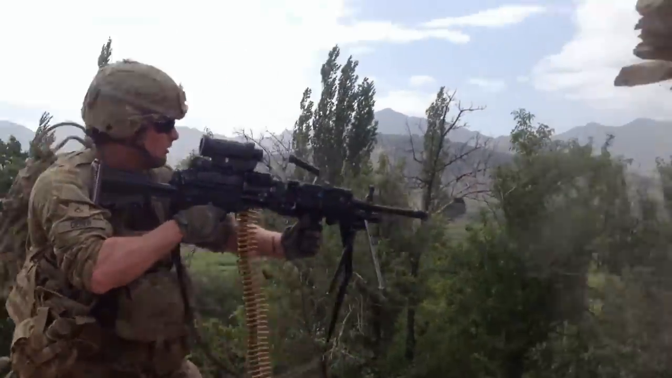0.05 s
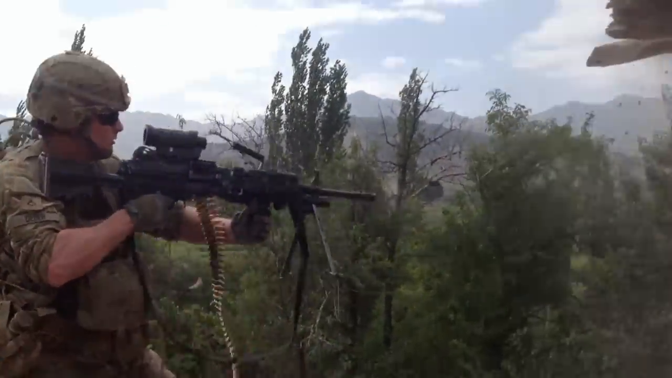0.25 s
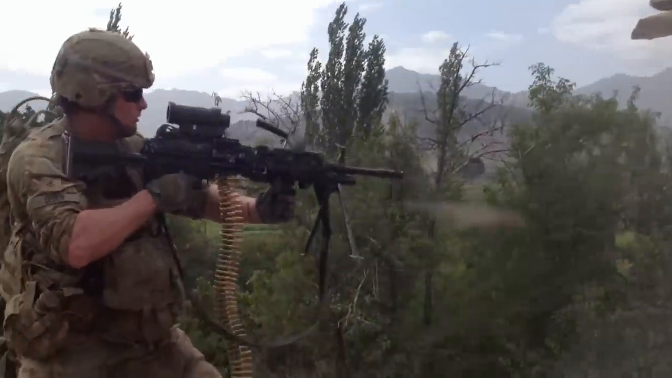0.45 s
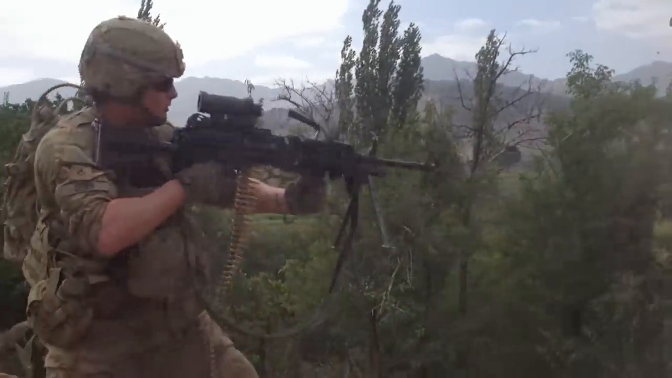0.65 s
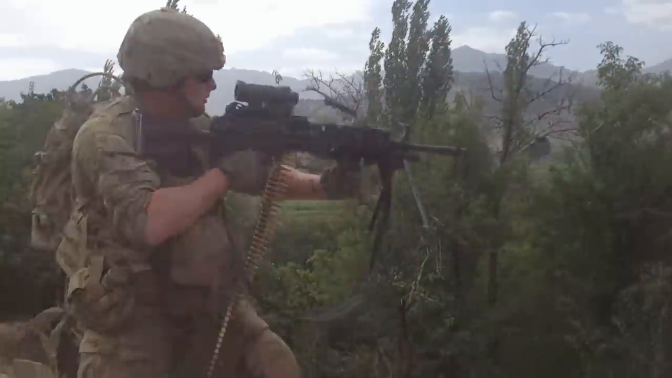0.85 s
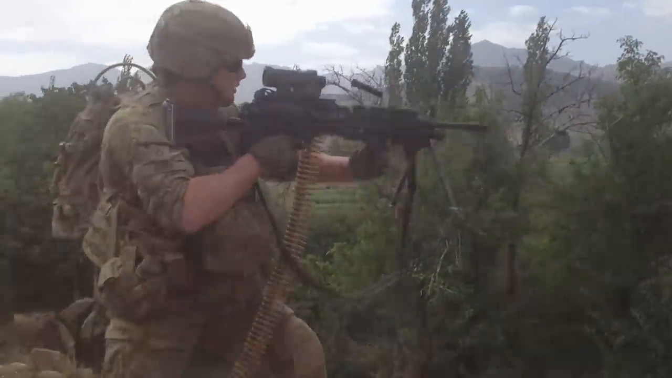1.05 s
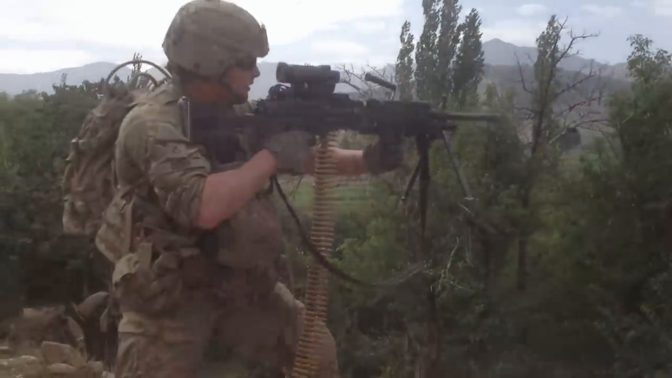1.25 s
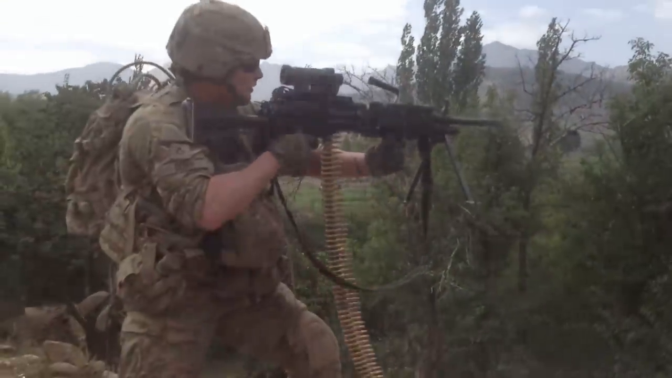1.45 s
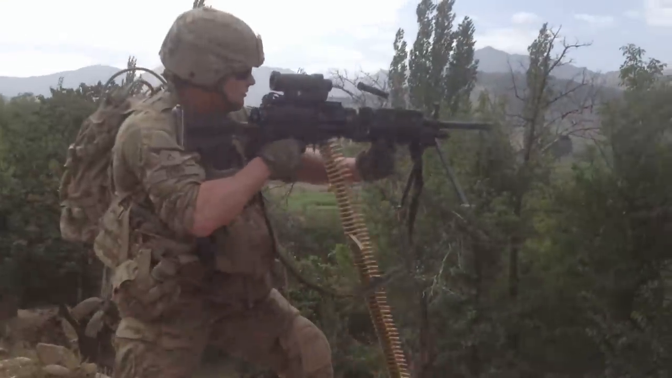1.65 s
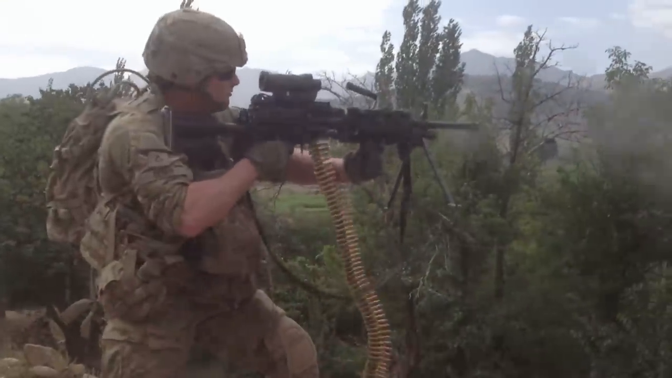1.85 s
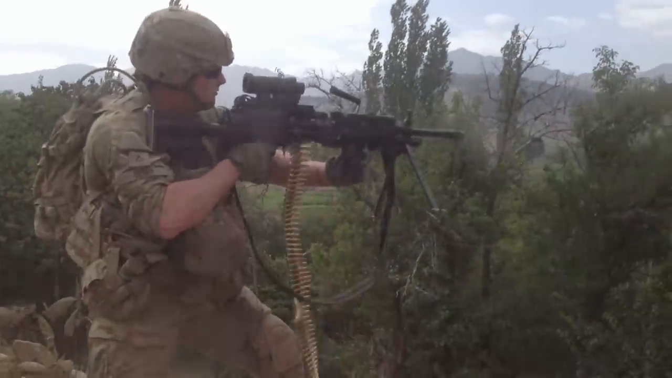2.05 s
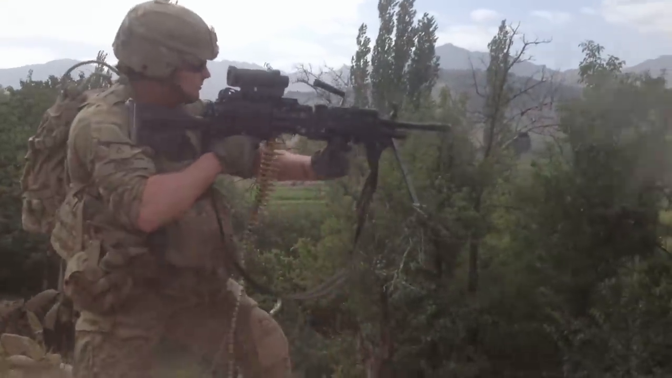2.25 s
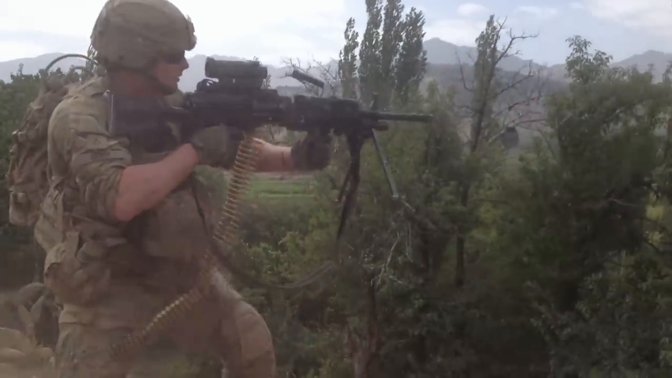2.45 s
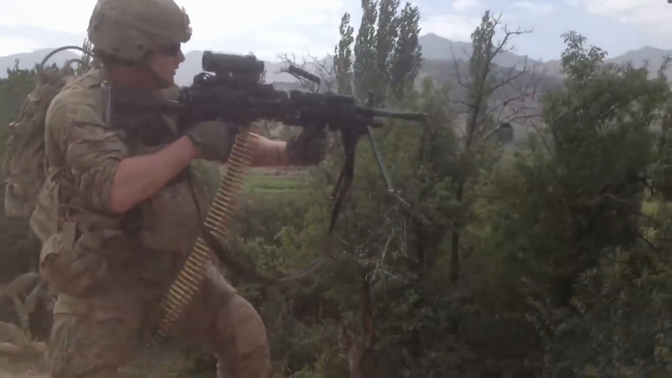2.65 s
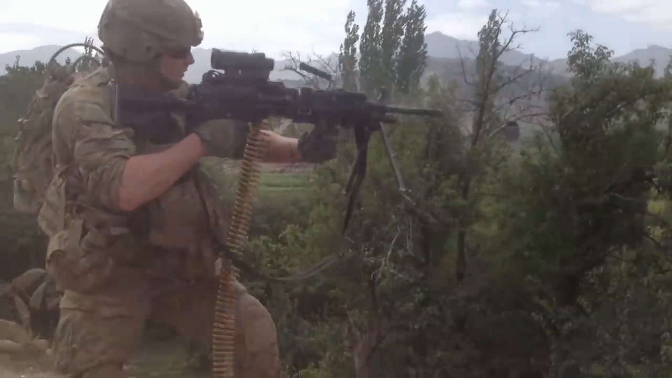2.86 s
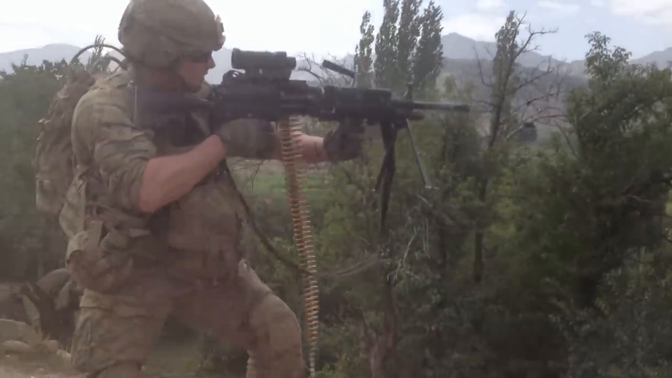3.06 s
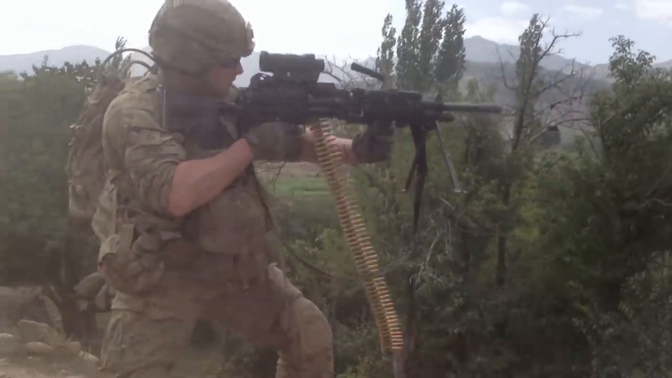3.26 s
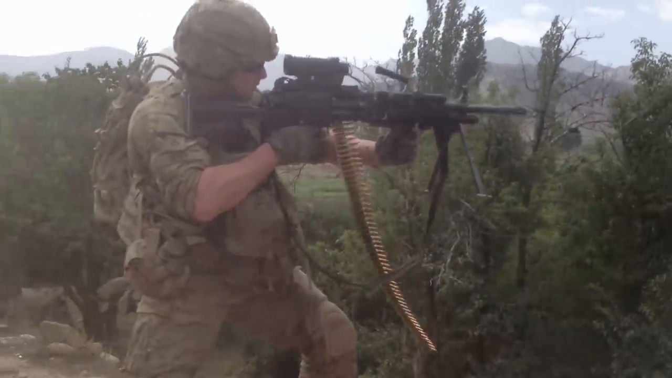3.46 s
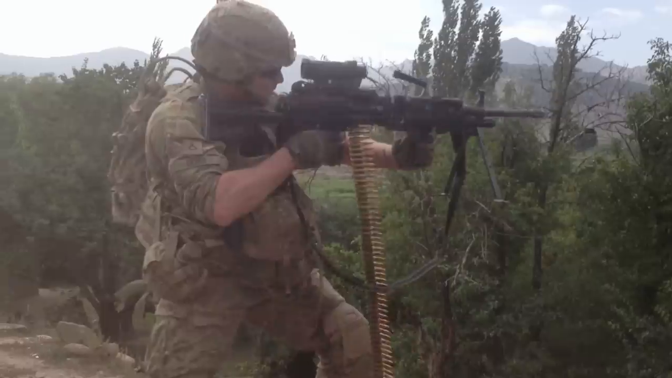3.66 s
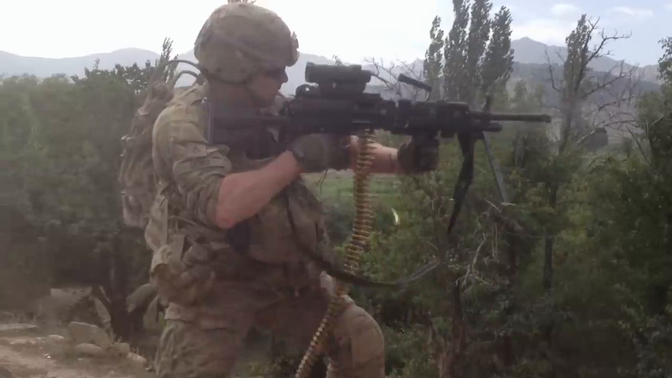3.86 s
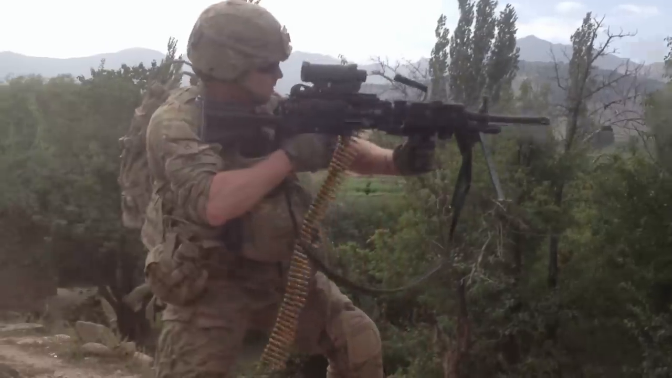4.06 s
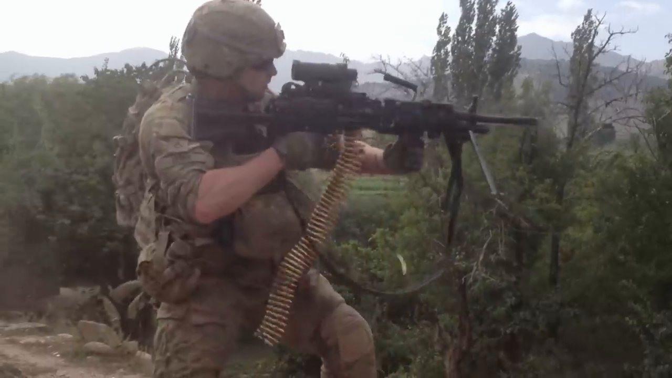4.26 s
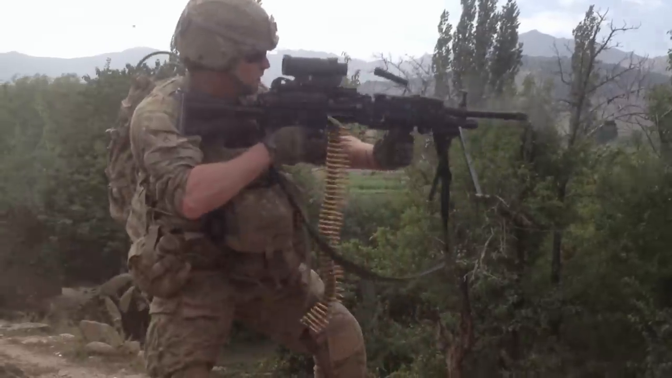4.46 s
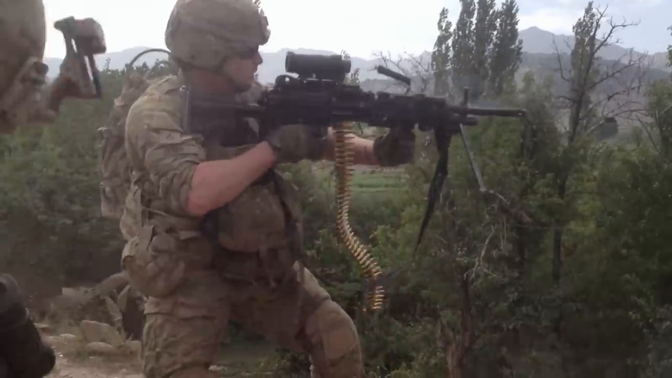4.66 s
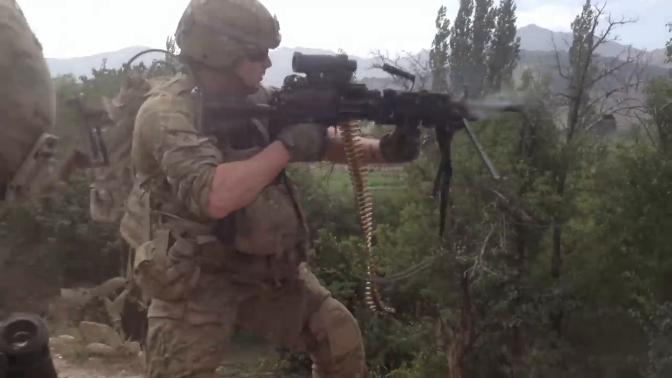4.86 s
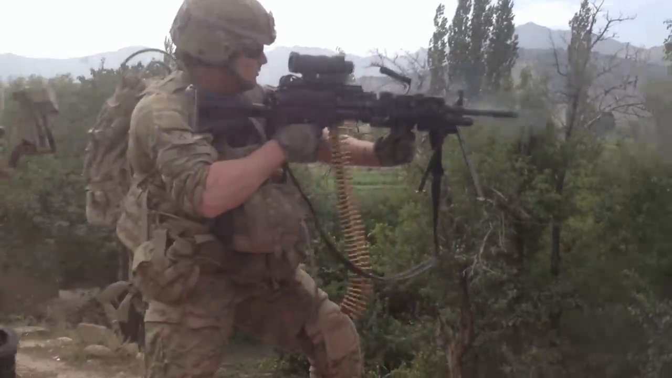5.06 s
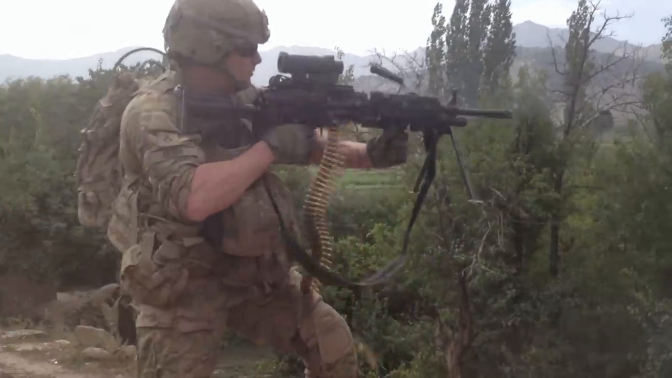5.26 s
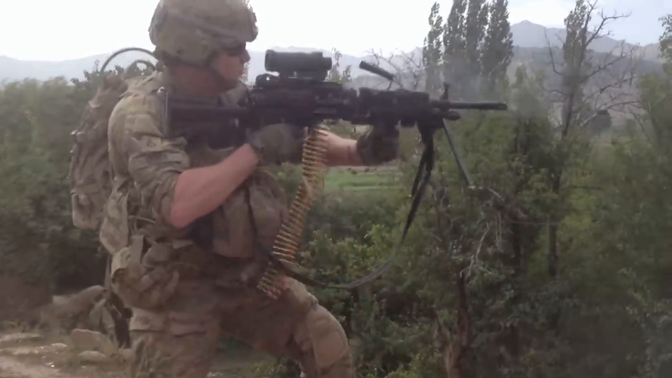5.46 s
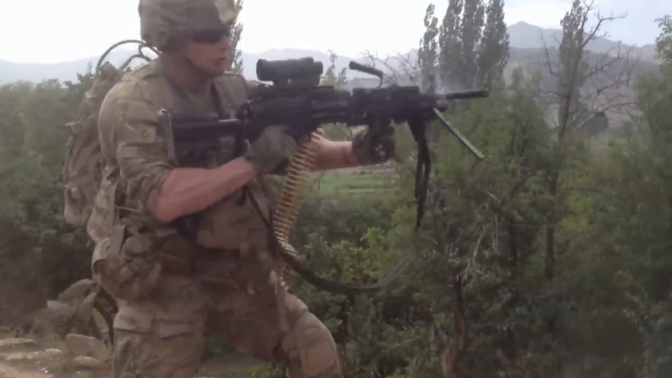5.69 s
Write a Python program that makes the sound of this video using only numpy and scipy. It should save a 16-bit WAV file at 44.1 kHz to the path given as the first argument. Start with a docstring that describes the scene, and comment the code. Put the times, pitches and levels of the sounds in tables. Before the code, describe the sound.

The sound starts immediately with a hard, distorted burst from a belt-fed gun, then a ringing valley tail, bright metal tinkles and three duller pops from another gun. A short rattle leads into a second burst. More tinkling and three faint thuds follow, then a third burst, a brief gap, and a fourth ends it. The close microphone clips and thumps over faint outdoor air.

```python
"""A belt-fed light machine gun fires a burst at once, each shot a blast with echoes off ground and walls.
The bolt clatters after each round as clusters of steel noise, slopes slap back, and the valley rings on.
In the pauses links and cases tinkle down as dying tones; another gun pops three times before the second burst.
Three dull thuds come before the third burst, and a fourth burst of gunfire ends the scene. The bolt rattles
before bursts 2 to 4. Blasts overload the microphone and push it into deep thumps, over faint outdoor air."""
import sys
import numpy as np
from scipy import signal
from scipy.fft import rfft, irfft
from scipy.io import wavfile
from scipy.ndimage import uniform_filter1d

SR = 44100
rng = np.random.default_rng(int(sys.argv[2]) if len(sys.argv) > 2 else 0)


def unload_wav(signal):
    """Save mono or channel-first audio to the path in sys.argv[1] as 16-bit WAV at rate SR, clipped to [-1, 1]."""
    wavfile.write(
        sys.argv[1],
        SR,
        np.round(np.clip(np.atleast_2d(signal).T, -1, 1) * 32767).astype(np.int16),
    )


N = 252472  # length of the scene in samples

# tone colour of the dragged belt and of metal ticks on stone: [f/Hz, relative level/dB]
BELT_COLOUR = [(100, -34), (500, -25), (1500, -14), (3200, -12.5), (4600, -6.5), (5600, 5), (6300, -4),
               (7500, -14), (10000, -22), (13000, -16), (16000, -22)]
# tone colour of the rolling far hills and of the outdoor air: [f/Hz, relative level/dB]
HILLS_COLOUR = [(30, -44), (80, -11), (170, -1.5), (420, -1), (750, -10.5), (1500, -13.5), (3500, -18.5),
                (5500, -14.5), (8000, -34.5), (15000, -31)]


def gain_of(db):
    """Turns decibels into an amplitude factor."""
    return 10 ** (np.asarray(db) / 20)


def read(points, hz):
    """Reads a table at the frequencies hz, with straight lines on a log-frequency axis."""
    f, value = np.transpose(points)
    return np.interp(np.log(hz + 1), np.log(f + 1), value)


def clock(size):
    """Gives the time in seconds of each of size samples."""
    return np.arange(size) / SR


def add(mix, s, sound):
    """Mixes a sound in at s seconds, cutting off what falls outside the mix."""
    at = round(s * SR)
    sound = sound[max(-at, 0):]
    part = mix[max(at, 0):][:len(sound)]
    part += sound[:len(part)]


def band(x, low_hz, high_hz):
    """Keeps the range between two frequencies, with gentle edges."""
    edges_hz = [low_hz, min(high_hz, SR / 2 - 1)]
    return signal.sosfilt(signal.butter(2, edges_hz, "band", fs=SR, output="sos"), x)


def noise(colour, size):
    """Makes noise of rms 1: the colour sets each frequency's strength, and its phase is random."""
    hz = np.fft.rfftfreq(size, 1 / SR)
    phases = np.exp(2j * np.pi * rng.random(len(hz)))
    x = irfft(gain_of(read(colour, hz)) * phases, size)
    return x / x.std()


def puff(colour, db, decay, rise=0.00057, size=8192):
    """Makes a burst of coloured noise that swells over rise seconds and dies away over decay seconds."""
    t = clock(size)
    envelope = (1 - np.exp(-t / rise)) * np.exp(-t / decay)
    return gain_of(db) * noise(colour, size) * envelope


def blast(t, push_ms):
    """A blast wave: a jump in pressure, then a longer suction."""
    u = np.maximum(t, 0) * 1000 / push_ms
    return (t >= 0) * (1 - u) * np.exp(-u)


def rattle(colour, db, decay, grain_db=1.5, rise=0.00057, size=8192):
    """Loose steel parts knock together: grainy noise, coloured by the metal's resonances, dies away."""
    t, hz = clock(size), np.fft.rfftfreq(size, 1 / SR)
    # a slower random curve makes the noise grainy
    knocks = uniform_filter1d(rng.standard_normal(size), size=48)
    grain = gain_of(grain_db * np.minimum(knocks / knocks.std(), 2))
    drive = rng.standard_normal(size) * grain
    x = irfft(rfft(drive) * gain_of(read(colour, hz)), size)
    envelope = (1 - np.exp(-t / rise)) * np.exp(-t / decay)
    return gain_of(db) * x / x.std() * envelope


def ring(modes, struck_hz, lift_db=10, detune=0.00146, spin_hz=11, tumble=0.86, rise=.00097, size=32768):
    """A small metal part rings in several dying tones; each swells and fades as the part tumbles."""
    t = clock(size)
    hz, db, t60 = np.transpose(modes)[:, :, None]
    pitch, strength, phase, spin, facing = rng.standard_normal((5, len(modes), 1))
    # the spot that is struck changes the level of the tones near struck_hz
    lift = lift_db * np.exp(-((hz - struck_hz) / 520) ** 2)
    db = db + 2.0 * strength + lift
    fade_db = -60 * t / t60  # t60 is the time to fall by 60 dB
    turn_hz = spin_hz * np.exp(.3 * spin)
    turning = 1 - tumble * np.sin(2 * np.pi * turn_hz * t + facing) ** 2
    tones = np.sin(2 * np.pi * (hz * (1 + detune * pitch) * t + phase))
    return (gain_of(db + fade_db) * turning * tones).sum(0) * (1 - np.exp(-t / rise))


def firing():
    """Each round follows the last by one bolt cycle: rows of (s, level dB, extra low-echo level dB)."""
    # pulls of the trigger; the rate of fire drifts as the belt swings:
    # [first shot t/s, count of rounds, rounds a minute at the start, in the middle, at the end]
    bursts = [(-.0091, 9, 763.6, 764.6, 758.7), (1.7654, 10, 736, 752.3, 787.2),
              (3.8947, 10, 750.3, 785, 760.6), (5.0545, 9, 769.8, 797.5, 772.7)]
    shot_db, uneven_db = 0.8, 0.5  # strength of a round, and its random spread
    boom_first_db, boom_last_db = -2.9, -0.45  # the low echoes build up through a burst
    shots = []
    for start, count, *per_minute in bursts:
        cycles = 60 / np.interp(np.linspace(0, 1, count - 1), [0, .5, 1], per_minute)
        times = start + np.r_[0, np.cumsum(cycles)]
        levels = shot_db + uneven_db * rng.standard_normal(count)
        booms = np.linspace(boom_first_db, boom_last_db, count)
        shots += zip(times, levels, booms)
    return shots


def muzzle(shots):
    """The blast arrives by the same paths each round; the turbulent crack of the gas is new each time."""
    # blast paths, direct and off nearby ground and walls: [delay/ms, level/dB, pressure push/ms]
    paths = [(.6, -44, 0.15), (5.32, -5, 1.57), (12.29, 2, 0.48), (16.99, -1, 0.33), (20.88, 8, 0.58),
             (25.8, -10.5, 0.96), (30.79, -0.5, 1), (33.86, 3, 0.78), (41.68, 0, 0.46), (47.04, -10, 0.45),
             (54.48, 0, 0.48), (65.2, -6, 0.81)]
    # tone colour of the escaping gas: [f/Hz, relative level/dB]
    crack_colour = [(60, -28), (200, -8), (500, 3.5), (1000, 2), (1600, 0.5), (3000, -0.5), (4200, 2.5),
                    (5050, 6), (6300, -4.5), (8000, -9.5), (10000, -26), (13000, -8.5), (16000, -18)]
    # tone colour of the scatter from rocks and leaves: [f/Hz, relative level/dB]
    scatter_colour = [(40, -37), (100, -10.5), (170, -15), (300, -3.5), (700, 2), (1100, -4.5),
                      (1600, -2.5), (3000, -7), (6000, -37), (10000, -42.5)]
    t, out = clock(size=8192), np.zeros(N)
    arrivals = sum(gain_of(db) * blast(t - ms / 1000, push) for ms, db, push in paths)
    boom = gain_of(2.5) * band(arrivals, low_hz=155.6, high_hz=910)
    # the nearest walls knock hardest
    boom += gain_of(-9.0) * band(arrivals, low_hz=420, high_hz=576) * (t < .04)
    # the farthest wall answers with a hollow note
    late, hollow_hz = t - .0663, 255
    boom -= gain_of(-11) * np.cos(2 * np.pi * hollow_hz * late) * np.exp(-(late / 0.0077) ** 2)
    surroundings = (1 - np.exp(-t / 0.0037)) * np.exp(-t / 0.084) / (1 + np.exp((t - .078) / 0.001))
    # rocks scatter every round alike
    boom += gain_of(-18.5) * noise(scatter_colour, len(t)) * surroundings
    roar = (1 - np.exp(-t / 0.0011)) / (1 + np.exp((t - .022) / 0.0045))
    for s, db, boom_db in shots:
        crack = gain_of(-5.5) * noise(crack_colour, len(t)) * roar
        leaves = gain_of(-20.5) * noise(scatter_colour, len(t)) * surroundings
        add(out, s, gain_of(db) * (gain_of(boom_db) * boom + crack + leaves))
        # the farthest wall also returns the crack
        add(out, s + .066, gain_of(db - 10) * band(crack, low_hz=1000, high_hz=3200))
    return out


def action(shots, jitter=.001, uneven_db=0.9):
    """The bolt locks, unlocks, hits its buffer and feeds the next round, never twice quite alike."""
    # steel blows in one cycle of the bolt: [delay after the shot/s, level/dB, decay/s]
    cycle = [(-.007, -14.5, 0.0063), (.003, -5.5, 0.02), (.026, -13.5, 0.013), (0.04, -10.5, 0.022),
             (0.063, -13.5, 0.046)]
    # tone colour of the bolt's steel: [f/Hz, relative level/dB]
    steel_colour = [(100, -47), (400, -2), (1200, -19.5), (3000, -9), (4200, -2), (5000, 3), (5600, 1),
                    (6500, -5.5), (8000, -14), (10000, -22.5), (13000, -17), (16000, -29)]
    out = np.zeros(N)
    for s, *_ in shots:
        for delay, db, decay in cycle:
            late, force = rng.standard_normal(2)
            blow = rattle(steel_colour, db + uneven_db * force, decay)
            add(out, s + delay + jitter * late, blow)
    return out


def run_up(count=4, grain_db=-2.5):
    """The freed bolt drags the belt in even jerks, harder as it gathers speed, then chambers a round."""
    # the trigger lets the bolt run forward before a burst: [t/s, length of the run/s, level/dB]
    run_ups = [(1.7095, .051, -16), (3.837, 0.052, -14), (5.008, 0.051, -19.5)]
    release_db, chamber_db = -8, 7  # the catch lets go; a round goes home
    drag_first_db, drag_last_db = -5.5, -3.5
    drag_delay_s, drag_decay_s = .005, 0.014
    out = np.zeros(N)
    for s, length, db in run_ups:
        add(out, s, rattle(BELT_COLOUR, db + release_db, decay=0.0057, rise=.002))
        jerks = np.linspace(drag_delay_s, length, count, endpoint=False)
        drags = np.linspace(drag_first_db, drag_last_db, count)
        for delay, drag_db in zip(jerks, drags):
            add(out, s + delay, rattle(BELT_COLOUR, db + drag_db, drag_decay_s, grain_db))
        add(out, s + length, rattle(BELT_COLOUR, db + chamber_db, decay=0.021))
    return out


def spent_metal(shots):
    """Links and cases tick on the stones and ring; stray links tinkle faintly after every round."""
    # belt links landing close by: [t/s, tick level/dB, ring level/dB, favoured tone f/Hz]
    links = [(1.025, -48, -42, 4050), (1.081, -48, -44.5, 4050), (1.117, -27, -41.5, 4130),
             (1.152, -55, -40.5, 5560), (1.28, -55, -47.5, 4960), (1.3585, -58, -45.5, 5740),
             (3.0066, -26, -42, 10800), (3.073, -33, -46.5, 5668), (3.312, -32, -48, 10600),
             (3.328, -44, -41, 4600), (3.46, -52, -50, 4066), (3.534, -41, -50, 5560),
             (3.605, -40, -53.5, 4066)]
    # empty cases landing close by: [t/s, tick level/dB, ring level/dB]
    cases = [(0.795, -42, -29), (2.838, -42, -38), (3.1192, -44, -37), (3.5245, -21, -30),
             (3.593, -26.5, -32), (3.747, -39, -34)]
    # ringing tones of a link: [f/Hz, level/dB, time to fall by 60 dB/s]
    link_modes = [(3850, -7.5, 0.66), (4060, -1, 0.55), (4960, -1.5, 0.49), (5660, -2, 0.32),
                  (5680, -2.5, 1), (7110, -11, 0.7), (8280, -17, 0.39), (9330, -19.5, 1),
                  (10680, -10.5, 0.61), (12680, -19, .4), (14250, -18, .4)]
    # ringing tones of a case: [f/Hz, level/dB, time to fall by 60 dB/s]
    case_modes = [(9570, -17, 0.36), (12420, -12, 0.32), (14630, -1, 0.24), (14760, -12, .3)]
    flip_s, flip_db = 0.0092, -9  # a case lands on one end, then on the other
    stray_fall_s, stray_spread_s, stray_db = 0.46, 0.67, -52  # links that land farther off
    out = np.zeros(N)
    for s, tick_db, ring_db, hz in links:
        add(out, s, puff(BELT_COLOUR, tick_db, decay=0.0016))
        add(out, s, gain_of(ring_db) * ring(link_modes, hz))
    for s, tick_db, ring_db in cases:
        add(out, s, puff(BELT_COLOUR, tick_db, decay=0.0019))
        add(out, s + flip_s, puff(BELT_COLOUR, tick_db + flip_db, decay=0.0014))
        # a negative lift softens the tones near struck_hz
        case_ring = ring(case_modes, struck_hz=14630, lift_db=-6.0, tumble=0.52)
        add(out, s, gain_of(ring_db) * case_ring)
    strays = [ring(link_modes, hz, size=16384) for hz, *_ in link_modes]
    for s, *_ in shots:
        landing_s = s + stray_fall_s + stray_spread_s * rng.random()
        add(out, landing_s, gain_of(stray_db) * strays[rng.integers(len(strays))])
    return out


def far_gun():
    """Dull pops: a small blast wave, its scatter off the ground and a short tail; later, faint thuds."""
    # rounds from the other gun: [t/s, level/dB]
    far_shots = [(1.4374, -18), (1.552, -18), (1.672, -17.5)]
    # dull, distant thuds: [t/s, level/dB]
    thuds = [(3.284, -32), (3.357, -28.5), (3.422, -27)]
    # tone colour of a far pop's scatter and tail: [f/Hz, relative level/dB]
    pop_colour = [(40, -31), (100, -4), (200, 1), (600, 0), (1200, -9), (2100, -10), (2700, -6),
                  (3400, -21), (6000, -18), (9000, -42)]
    t, out = clock(size=8192), np.zeros(N)
    for s, db in far_shots:
        pop = band(blast(t, push_ms=0.92), low_hz=140.3, high_hz=2604)
        pop += puff(pop_colour, -2.5, decay=0.0028, rise=0.0028)
        pop += puff(pop_colour, -17.0, decay=0.018)
        add(out, s, gain_of(db) * pop)
    for s, db in thuds:
        add(out, s, gain_of(db) * band(blast(t, push_ms=2.7), low_hz=94.5, high_hz=180))
    return out


def slap_back(shots):
    """Each slope returns every round as a dull slap of noise."""
    # slopes that throw a shot back: [delay/s, level/dB, decay/s]
    slopes = [(0.253, -44, 0.035), (0.335, -25.5, 0.036), (.5, -41.5, .04)]
    # tone colour of the slap: [f/Hz, relative level/dB]
    slap_colour = [(60, -17), (150, -15.5), (310, -0.5), (420, -5.5), (700, -15), (2000, -21), (5000, -25),
                   (9000, -49)]
    out = np.zeros(N)
    for delay, db, decay in slopes:
        for s, shot_db, _ in shots:
            add(out, s + delay, puff(slap_colour, db + shot_db, decay, rise=0.0081))
    return out


def valley(shots):
    """Trees scatter each shot in noise whose pitches fade at their own pace; far hills roll on for seconds."""
    # tone colour of the scatter from the trees: [f/Hz, relative level/dB]
    valley_colour = [(30, -40), (80, 0), (160, 7), (300, 3), (600, 6), (1200, -9), (3000, -9.5),
                     (4200, -5.5), (5300, 4), (6500, -7), (9500, -23), (15000, -22)]
    # how long the trees' scatter lasts: [f/Hz, time to fall by 60 dB/s]
    valley_t60 = [(100, 0.56), (400, 0.68), (2000, 1.25), (5000, 0.95), (8000, 0.83), (14000, 0.6)]
    t, out = clock(size=4 * SR), np.zeros(N)
    hz, when, z = signal.stft(noise(valley_colour, len(t)), SR, nperseg=512)
    fade_db = -60 * when / read(valley_t60, hz)[:, None]
    trees = signal.istft(z * gain_of(fade_db), SR, nperseg=512)[1][:len(t)]
    echo = gain_of(-18) * trees * (1 - np.exp(-t / 0.013))
    hills_envelope = (1 - np.exp(-t / 0.31)) * np.exp(-t / 1.32)
    echo += gain_of(-49.5) * noise(HILLS_COLOUR, len(t)) * hills_envelope
    for s, db, _ in shots:
        add(out, s, gain_of(db) * echo)
    return out


def thump(db=-27.0, swing=0.0074):
    """Each blast shoves the microphone to one side, and it creeps back: a deep thump."""
    u, out = clock(size=4096) / swing, np.zeros(N)  # the push peaks at u = 1
    for s, *_ in firing():
        add(out, s - .002, -gain_of(db) * u ** 2 * np.exp(2 * (1 - u)))
    return out


def scene():
    """Both guns, the falling metal and the valley over faint outdoor air."""
    shots = firing()
    gun = muzzle(shots) + action(shots) + run_up()
    echoes = slap_back(shots) + valley(shots)
    air = gain_of(-58.0) * noise(HILLS_COLOUR, N)
    return (gun + echoes + spent_metal(shots) + far_gun() + air)[None]


def record(dry, ceiling=0.75, knee=3.74):
    """The microphone overloads hard and thumps under the blasts; then the top of the treble is cut off."""
    edge_hz = 15550
    clipped = dry / (1 + np.abs(dry / ceiling) ** knee) ** (1 / knee)
    low_cut = signal.butter(2, 75, "high", fs=SR, output="sos")
    thumping = signal.sosfiltfilt(low_cut, clipped) + thump()
    treble_cut = signal.firwin(511, edge_hz, window=("kaiser", 9), fs=SR)
    return signal.oaconvolve(thumping, treble_cut[None], "same")


dry = scene()
out = record(dry)
unload_wav(out)
```